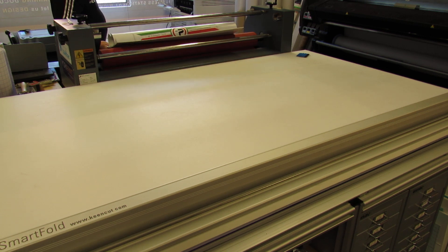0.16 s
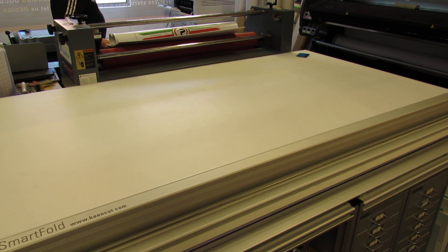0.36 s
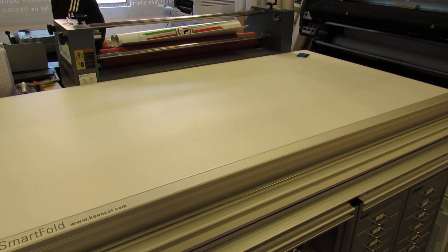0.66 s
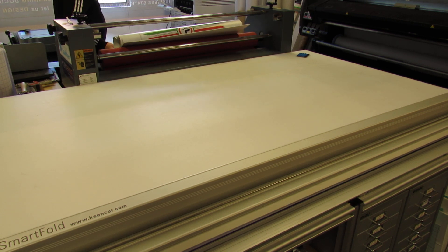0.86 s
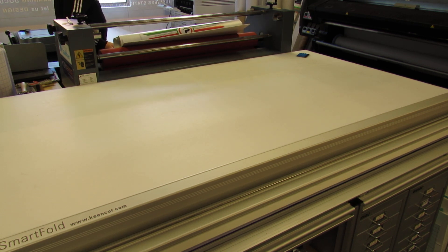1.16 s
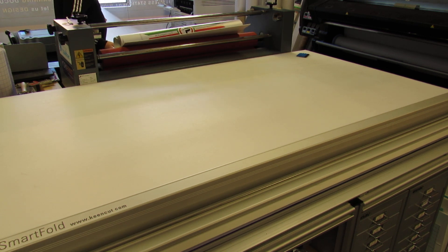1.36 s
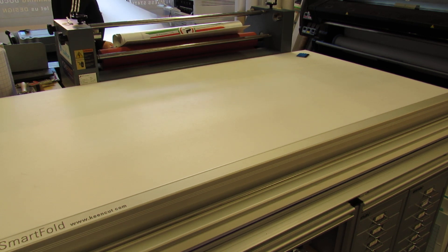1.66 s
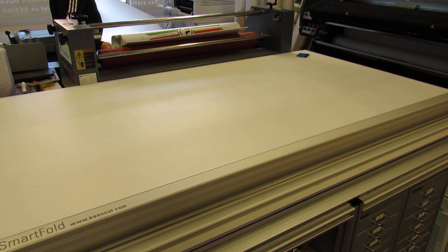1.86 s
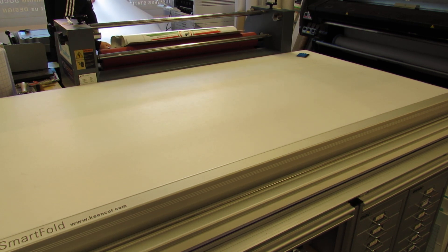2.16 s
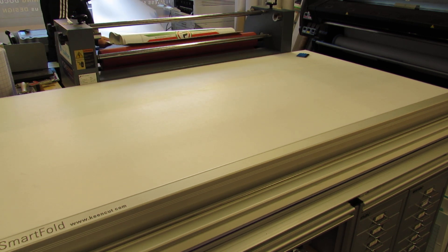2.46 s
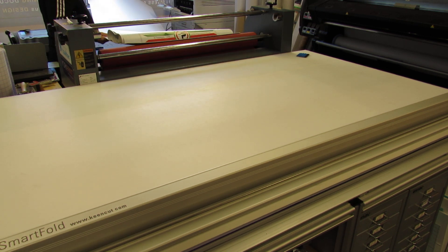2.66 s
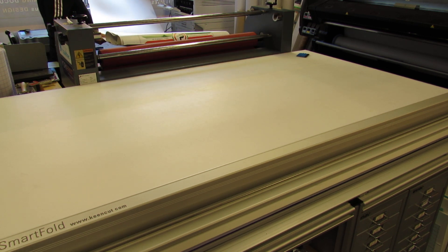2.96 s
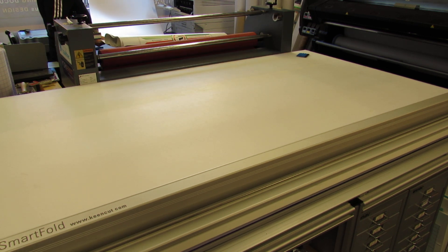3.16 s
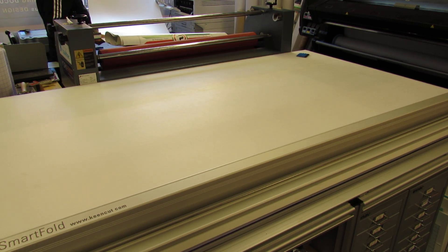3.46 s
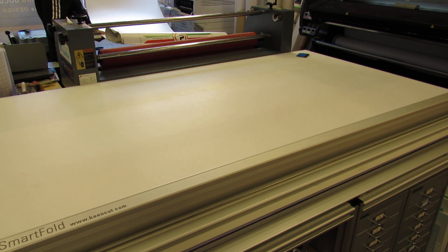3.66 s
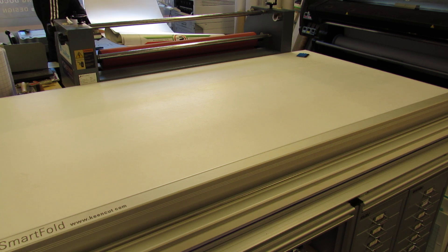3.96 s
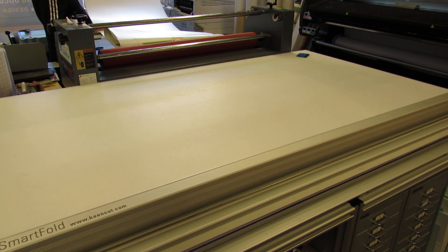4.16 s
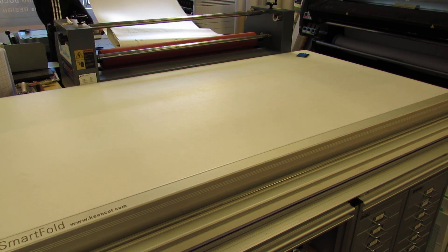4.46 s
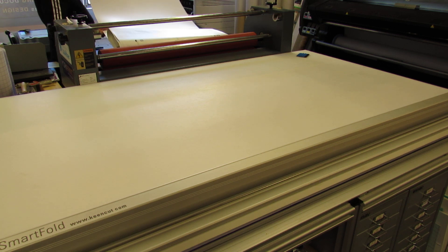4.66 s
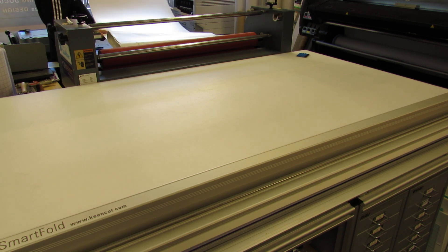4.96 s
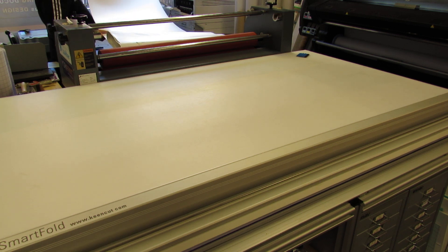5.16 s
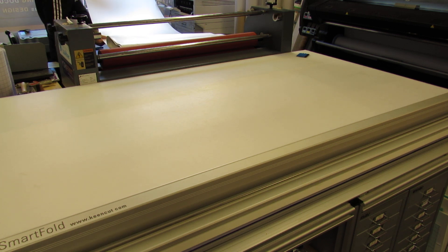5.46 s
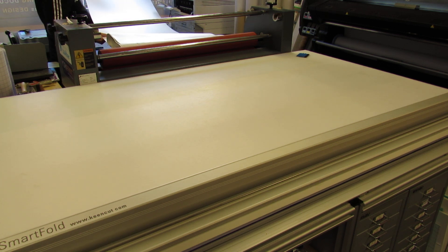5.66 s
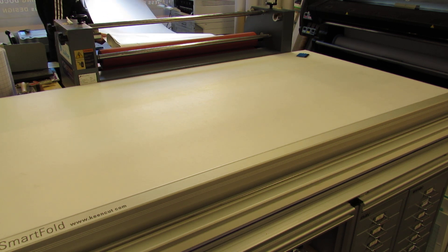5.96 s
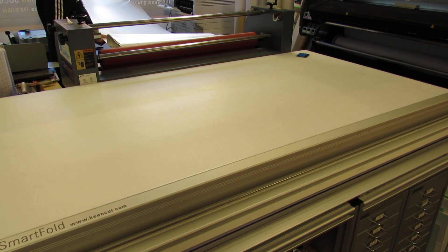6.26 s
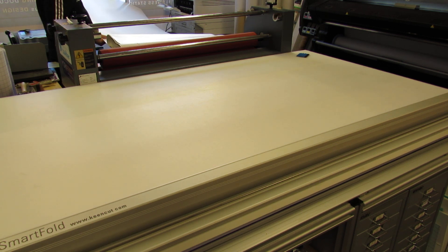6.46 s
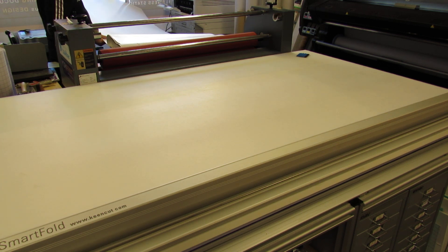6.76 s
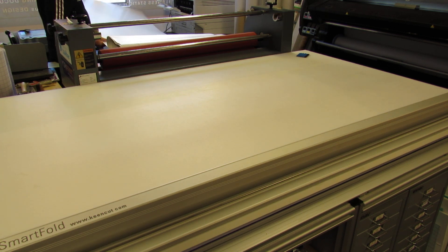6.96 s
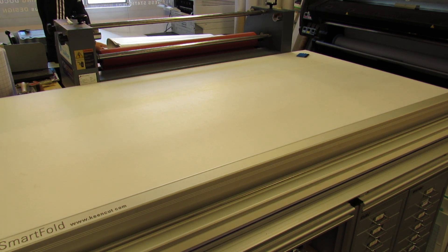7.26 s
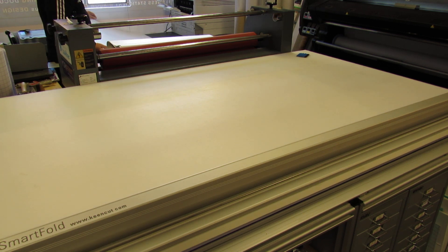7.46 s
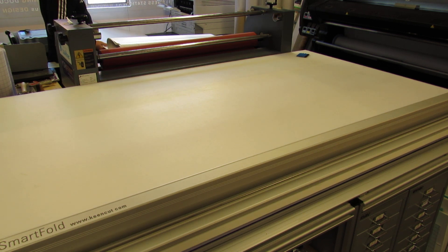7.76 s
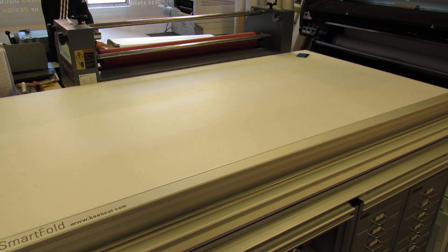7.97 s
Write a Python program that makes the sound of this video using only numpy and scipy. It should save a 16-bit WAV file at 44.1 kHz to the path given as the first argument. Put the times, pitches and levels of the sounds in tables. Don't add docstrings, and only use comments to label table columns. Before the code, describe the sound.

Machine hum and fan rush in a workshop while a stiff plastic sheet hisses and scrapes, snaps sharply, clinks metal, then thuds heavily.

```python
import sys
import numpy as np
from scipy import signal
from scipy.fft import rfft, irfft, next_fast_len
from scipy.io import wavfile
from scipy.ndimage import uniform_filter1d, map_coordinates

SR = 44100
rng = np.random.default_rng(int(sys.argv[2]) if len(sys.argv) > 2 else 0)


def digitize_waveform(pressure):
    field = np.atleast_2d(pressure).T
    bounded = np.clip(field, -1, 1)
    quanta = np.round(bounded * 32767).astype(np.int16)
    wavfile.write(sys.argv[1], SR, quanta)


def volts_from_decibels(level):
    exponent = np.asarray(level, float) / 20
    return 10 ** exponent


N = 357210


def unit(x):
    return x / np.sqrt(np.mean(x ** 2) + 1e-20)


def along(points, hz):
    f, v = np.transpose(points)
    return np.interp(np.log(hz + 1), np.log(f + 1), v)


def wobble(rate):
    knots = rng.standard_normal(int(N * rate / SR) + 4)
    return map_coordinates(knots, [np.arange(N) * rate / SR])


def filtered(x, response):
    m = next_fast_len(x.shape[-1] + 8192)
    return irfft(rfft(x, m) * response(np.fft.rfftfreq(m, 1 / SR)), m)[..., :x.shape[-1]]


def spread(pair, alike):
    turn = lambda hz: np.arccos(np.clip(along(alike, hz), -1, 1)) / 2
    mid, side = filtered(pair, lambda hz: np.array([np.cos(turn(hz)), np.sin(turn(hz))]))
    return np.array([mid + side, mid - side])


def rush(spectrum, alike, patchy_db):
    z = signal.stft(rng.standard_normal((2, N)), nperseg=512)[2]
    field = uniform_filter1d(rng.standard_normal(z.shape[1:]), size=5, axis=0)
    field = uniform_filter1d(field, size=10, axis=1)
    pair = signal.istft(z * volts_from_decibels(patchy_db * unit(field)), nperseg=512)[1][:, :N]
    colored = filtered(pair, lambda hz: volts_from_decibels(along(spectrum, hz)))
    return unit(spread(colored, alike))


def swells(rows):
    s, rise, fall, db = np.transpose(rows)[:, :, None]
    t = np.arange(0, N + 32, 32) / SR
    before = (s - t) / np.maximum(rise, 1e-3)
    after = (t - s) / np.maximum(fall, 1e-3)
    gains = volts_from_decibels(db - 20 * np.maximum(before, after))
    return np.interp(np.arange(N) / SR, t, np.linalg.norm(gains, axis=0))


def add(out, s, x):
    room = out[:, round(s * SR):][:, :x.shape[-1]]
    room += x[..., :room.shape[1]]


# (fastest [s], speeding up [s], slowing down [s], hiss [dB], scrape over hiss [dB])
STROKES = [(0.0, 0.086, 0.37, -56.5, 2.5), (0.4, 0.7, 0.49, -57, 0.5), (0.5, 0.21, 0.58, -53.5, 2),
           (0.7, 0.012, 0.56, -51, 3), (0.87, 0.2, 0.17, -43, -1), (1.41, 0.26, 0.54, -51, -9),
           (1.52, 0.35, 0.16, -52.5, 4), (1.8, 0.18, 0.42, -62, 3), (1.905, 0.1, 0.32, -50, -6),
           (2.09, 0.26, 0.49, -51.5, -1.5), (2.65, 0.46, 0.62, -59, 10.5), (3.08, .2, .4, -60, 4),
           (3.62, 0.044, 0.49, -44, -17), (3.76, 0.09, 0.31, -52.5, 11.5), (4.2, 0.17, 0.19, -39, -4),
           (4.55, 0.37, 0.6, -50, -1.5), (4.625, 0.14, 0.32, -55, 9), (5.56, 0.61, .2, -63, -7),
           (7.005, 0.021, 0.33, -49.5, 0), (7.055, 0.058, 0.22, -43.5, -4), (7.105, 0.03, 0.2, -42, -3),
           (7.14, 0.16, 0.18, -37, -1), (7.35, 0.26, 0.12, -52.5, 18), (7.618, 0.5, 0.21, -53, 9.5),
           (7.9, 0.54, 0.14, -65.5, 13), (8.03, 0.088, 0.38, -52, 6)]
# (time [s], hiss [dB], scrape over hiss [dB])
EDGE_SLIPS = [(1.15, -56.5, 1.5), (1.3, -52, 0.5), (2.894, -61, 5), (3.206, -63, 8), (4.92, -62, 5),
              (5.218, -62, 6), (5.452, -66, 7), (6.36, -63, 1), (6.488, -64.5, 11.5), (6.572, -71.5, 10),
              (7.435, -52.5, 10.5), (7.83, -58, -4)]
# (frequency [Hz], density [dB per Hz])
HISS_SPECTRUM = [(1290, -28), (2200, 3.5), (3800, -5.5), (4050, -5), (8210, -4), (10700, -7), (15000, -7.5)]
# (frequency [Hz], density [dB per Hz])
SCRAPE_SPECTRUM = [(380, -39), (650, -60.5), (712, -7), (1010, 4), (1900, -2), (2340, -15), (3500, -15.5),
                   (4550, -19.5), (7700, -120)]
# (frequency [Hz], left-right likeness [0-1])
NEAR_LIKENESS = [(60, 0.16), (130, 0.34), (290, 1), (640, 0.82), (1410, 0.97), (3100, 1), (6820, 0.98),
                 (15000, 0.083)]


def sheet():
    slip_rise_s, slip_fall_s = 0.033, 0.14
    strokes = STROKES + [(s, slip_rise_s, slip_fall_s, db, over_db) for s, db, over_db in EDGE_SLIPS]
    judder = wobble(28)
    hiss_gain = swells([row[:4] for row in strokes]) * volts_from_decibels(1.0 * judder)
    scrape_gain = swells([(s, rise, fall, db + over_db) for s, rise, fall, db, over_db in strokes])
    scrape_gain = scrape_gain * volts_from_decibels(0.5 * judder)
    hiss = hiss_gain * rush(HISS_SPECTRUM, NEAR_LIKENESS, patchy_db=1.1)
    return hiss + scrape_gain * rush(SCRAPE_SPECTRUM, NEAR_LIKENESS, patchy_db=0.7)


# (start [s], end [s], from [Hz], to [Hz], level [dB])
GAP = (4.08, 4.27, 1300, 3100, -46)


def swish():
    start, end, from_hz, to_hz, db = GAP
    u = np.clip((np.arange(N) / SR - start) / (end - start), 0, 1)
    phase = 2 * np.pi * np.cumsum(from_hz + (to_hz - from_hz) * u) / SR
    narrow = wobble(1600) * np.sin(phase) + wobble(1600) * np.cos(phase)
    return volts_from_decibels(db) * np.sin(np.pi * u) * narrow


# (frequency [Hz], t60 [s])
HALL_DECAY = [(200, 0.37), (1500, 0.82), (4000, 0.61), (12000, 0.35)]


def hall():
    hz, t, z = signal.stft(rng.standard_normal((2, SR * 3 // 4)), SR, nperseg=256)
    decay = volts_from_decibels(-60 * t / along(HALL_DECAY, hz)[:, None])
    tail = signal.istft(z * decay, SR, nperseg=256)[1]
    return spread(tail / np.linalg.norm(tail[0]), NEAR_LIKENESS)


def slaps(rows):
    out = np.zeros((2, N))
    tilt = [(900, 1), (2500, -4.5), (6500, 0.0), (14000, -7.5)]  # (frequency [Hz], level [dB])
    softening_db = -0.02
    for s, db, body_hz, shelf_db, contact, room_db in rows:
        tail = hall()
        u = np.arange(tail.shape[1]) / SR / max(contact, .0003)
        burst = rng.standard_normal(len(u)) * u * np.exp(1 - u)
        build_up = 1 - np.exp(-(u * contact / (contact + 0.0079)) ** 2)
        sound = burst + volts_from_decibels(room_db) * np.linalg.norm(burst) * tail * build_up
        modes = rng.standard_normal(300)
        body = lambda hz: volts_from_decibels(-11 * np.log2((hz + 1) / body_hz) ** 2)
        shelf = lambda hz: volts_from_decibels(shelf_db - softening_db * contact * hz + along(tilt, hz))
        uneven = lambda hz: volts_from_decibels(2.0 * map_coordinates(modes, [hz / 75]))
        add(out, s, volts_from_decibels(db + 2.5) * filtered(sound, lambda hz: (body(hz) + shelf(hz)) * uneven(hz)))
    return out


# (time [s], peak [dB], body [Hz], contact length [s], room [dB])
SHEET_SNAPS = [(0.6928, -36.5, 4050, 0.00041, 0.5), (2.499, -52, 5070, 0.0021, 3),
               (2.502, -38, 2620, 0.0084, 3), (2.716, -50, 1490, 0.0027, -5),
               (3.532, -27.5, 1820, 0.0046, 9.5), (3.535, -23, 6340, .0008, -2),
               (3.539, -23, 6300, 0.0011, -6), (3.815, -27.5, 1820, 0.016, 4.5),
               (4.2883, -29, 4400, 0.0011, -2), (4.2932, -22.5, 3850, 0.00028, 0),
               (4.299, -29.5, 3970, 0.0016, 3), (4.313, -44, 4270, 0.0089, -9)]


def snaps():
    shelf_db = -1
    return slaps([(s, db, hz, shelf_db, contact, room_db) for s, db, hz, contact, room_db in SHEET_SNAPS])


# (time [s], peak [dB], body [Hz], bright shelf [dB], room [dB])
DULL_KNOCKS = [(0.643, -34.5, 1250, -41, 0), (2.097, -36, 1550, -13.5, 9.5), (2.446, -42.5, 1190, -15, 8.5),
               (3.522, -29.5, 1480, -14, -3), (3.735, -35.5, 2280, -16, 9), (4.286, -27, 885, -18, 3),
               (5.004, -37, 1210, -14, 2), (5.031, -27, 600, -23, -5), (5.239, -50, 1096, -16, 5),
               (6.893, -26, 1230, -35, 1), (7.148, -28, 1250, -22, 9), (7.251, -19, 900, -34, -15),
               (7.286, -21, 1370, -28, -0.5), (7.328, -26.5, 1310, -25, 2)]


def knocks():
    contact_s = 0.0058
    return slaps([(s, db, hz, shelf_db, contact_s, room_db) for s, db, hz, shelf_db, room_db in DULL_KNOCKS])


# (time [s], peak [dB], body [Hz], contact length [s], room [dB])
SMALL_TAPS = [(0.696, -39, 1800, .003, -5), (0.797, -33, 800, .002, -6), (5.037, -49, 1600, 0.0034, 2.5),
              (6.9, -26.5, 1660, 0.0018, -2), (7, -42, 1180, 0.0027, -4), (7.023, -39, 956, .003, -4),
              (7.152, -23, 1400, 0.0032, -4), (7.293, -39, 2480, .003, 3), (7.342, -39, 1900, 0.0027, 0),
              (7.365, -37, 1500, .003, -2), (3.53, -27, 8000, .0006, -10), (3.5433, -21, 7000, .0003, -10),
              (3.5447, -24, 8000, .0007, -8), (3.831, -26, 2200, .002, -10), (5.014, -45, 1600, .004, 3),
              (7.144, -38, 3500, 0.0018, 2), (7.4, -34, 500, .003, -8), (0.646, -40, 1390, .0015, -6),
              (7.254, -26, 1000, .0015, -10), (7.035, -41.5, 3500, .003, 0)]


def taps():
    shelf_db = -24.5
    return slaps([(s, db, hz, shelf_db, contact, room_db) for s, db, hz, contact, room_db in SMALL_TAPS])


def struck_modes(rows):
    out, t = np.zeros((2, N)), np.arange(SR // 2) / SR
    weights, offsets_hz = np.array([[.5], [1], [.5]]), np.array([[-13], [0], [17]])
    for s, db, hz, t60 in rows:
        phase = rng.standard_normal((3, 1))
        modes = weights * np.sin(2 * np.pi * (hz + offsets_hz) * t + 3 * phase)
        shape = volts_from_decibels(db - 60 * t / max(t60, .03)) * (1 - np.exp(-t / 0.0018))
        add(out, s, shape * np.sum(modes, axis=0) + np.zeros((2, 1)))
    return out


# (time [s], peak [dB], pitch [Hz], t60 [s])
PANEL_THUDS = [(0.829, -39, 93, 0.62), (0.868, -38.5, 460, 0.32), (2.08, -40.5, 366, 0.61),
               (2.2, -37, 154, 0.57), (2.459, -36.5, 359.4, 0.45), (2.622, -37, 368, 0.65),
               (2.889, -39, 375, 0.46), (3.537, -29.5, 1082, 0.2), (3.549, -34.5, 215.4, 0.29),
               (4.159, -41, 448, 0.17), (4.292, -31, 566, 0.1), (5.006, -37, 415, 0.32),
               (5.017, -33.5, 155.4, 0.41), (5.151, -37, 305, 0.25), (5.215, -38, 377, 0.29),
               (5.019, -44, 1016, 0.41), (6.894, -30.5, 284, 0.34), (6.931, -44.5, 83.6, 0.92),
               (7.029, -32, 387, 0.24), (7.099, -58, 78.6, .7), (7.24, -26, 289, 0.2),
               (7.254, -24, 470, 0.07), (7.335, -29, 499, 0.13), (7.301, -33, 85, 0.9),
               (7.402, -36, 73.2, 0.57), (7.599, -27.5, 286.7, 0.47), (7.61, -48, 54.6, 0.55),
               (7.641, -31.5, 483, 0.22), (7.77, -37.5, 297, 0.6), (8.041, -36.5, 482, 0.28)]


def thuds():
    return struck_modes(PANEL_THUDS)


# (time [s], peak [dB],
# pitch [Hz], t60 [s])
STRUCK_PINGS = [(2.104, -55, 1873, .4), (2.104, -46, 2116, .5), (2.104, -50, 2740, .26),
                (2.104, -54, 3128, .33), (2.104, -51, 3472, 0.36), (2.506, -38, 575, .6),
                (2.506, -51, 1720, .6), (2.506, -45, 3445, .4), (2.506, -47, 3820, .4),
                (2.504, -47, 5575, 0.18), (2.504, -44, 6600, .18), (3.538, -43, 1525, .6),
                (3.538, -41, 1677, .6), (3.538, -48, 2024, .7), (3.538, -38, 3052, .4),
                (3.538, -40, 4301, .39), (3.538, -36, 6331, .2), (3.822, -28, 1490, .2),
                (3.822, -46, 1841, .46), (3.822, -34, 1992, 0.44), (3.822, -34, 2265, 0.39),
                (3.822, -37, 3806, 0.28), (5.035, -44, 150, .3), (5.04, -40, 500, .25),
                (7.03, -48, 500, 0.22), (3.538, -50, 10866, .36), (3.538, -45, 6721, .4),
                (4.297, -42, 2643, .26), (4.297, -45, 2988, 0.24), (4.297, -46, 3700, 0.31),
                (4.297, -42.5, 4300, .28), (7.262, -30.5, 150.5, 0.35), (7.3, -35, 287, 0.57),
                (2.506, -56, 4690, 0.44)]


def pings():
    return struck_modes(STRUCK_PINGS)


# (frequency [Hz], level [dB], t60 [s])
BAR_MODES = [(535, -9, 1.2), (905, -12, .3), (940, -6, .7), (959, -4, .75), (1167, -8, .85),
             (1220, -11, .8), (1663, -15, .6), (2105, -16, .5), (2379, -13, .4), (2891, -12, .35),
             (3230, -15, .55), (3700, -12, .4), (3758, -15, .35), (4317, -19, .45), (4635, -14, .7),
             (5592, -10, .4), (6584, -16, .3), (8037, -18, .2)]
# (time [s], level [dB])
BAR_CLINK = (2.504, -32)


def bar():
    out, t, ring = np.zeros((2, N)), np.arange(SR * 2 // 3) / SR, 0
    waver = lambda hz: wobble(15 + hz / 60)[:len(t)]
    for hz, db, t60 in BAR_MODES:
        level = volts_from_decibels(db - 60 * t / t60 + 2.2 * waver(hz))
        ring = ring + level * np.sin(2 * np.pi * hz * t + .5 * waver(hz))
    s, db = BAR_CLINK
    add(out, s, volts_from_decibels(db) * ring * (1 - np.exp(-t / 0.008)) + np.zeros((2, 1)))
    return out


# (center [Hz], width [Hz], depth [0-1])
TABLE_NOTCH = (690, 125, .9)


def across_table(struck):
    center_hz, width_hz, depth = TABLE_NOTCH
    return filtered(struck, lambda hz: 1 - depth * np.exp(-((hz - center_hz) / width_hz) ** 2))


# (time [s], dying [s], boards [dB], frame [dB])
BENCH_JOLTS = [(0.0, 0.29, -42, -40.5), (0.22, 0.058, -39.5, -48), (0.36, .6, -50, -63),
               (0.79, 0.55, -39, -41.5), (1.15, 0.7, -46, -42.5), (1.38, .5, -40.5, -45),
               (1.58, 0.9, -44, -47), (1.92, 0.37, -50, -41.5), (2.07, 0.16, -33.5, -35.5),
               (2.28, 0.95, -42.5, -47), (2.622, 1, -42, -52), (3.05, 0.6, -39.5, -45),
               (3.59, 0.39, -48, -32.5), (3.76, 0.2, -35, -40.5), (4.17, .15, -36, -39),
               (4.78, 0.18, -36.5, -59), (4.87, 0.097, -79, -39.5), (5.05, .14, -34, -41),
               (5.245, 0.15, -39, -58), (6.3, 0.19, -41, -48), (6.43, 0.33, -43, -49),
               (6.54, 0.44, -58, -39), (7.04, 0.2, -31, -32.5), (7.09, 0.18, -34, -44),
               (7.17, 0.65, -26.5, -33), (7.3, 0.35, -24, -25.5), (7.62, 0.17, -30, -62),
               (7.78, 0.65, -36, -45), (8.048, 1, -36.5, -41.5)]
# (time [s], dying [s], boards [dB], frame [dB])
BENCH_BLOWS = [(2.105, 0.21, -33, -48), (2.464, 0.71, -34.5, -35.5), (3.538, 0.22, -29, -52),
               (4.295, 0.58, -36.5, -45), (5.012, 0.25, -33, -45), (6.901, 0.13, -29, -29.5),
               (7.255, 0.041, -18, -25.5)]
# (frequency [Hz], density [dB per Hz])
BOARDS_SPECTRUM = [(140, -28), (240, -6.5), (291, -1), (413, -8), (519, -4), (700, -23.5), (910, -15),
                   (1540, -120)]
# (frequency [Hz], density [dB per Hz])
FRAME_SPECTRUM = [(62, -15), (105, -14.5), (151, 0), (250, -4), (320, -47), (550, -120)]


def bench():
    jolt_rise_s, blow_rise_s = 0.12, 0.017
    shakes = [(s, jolt_rise_s, *rest) for s, *rest in BENCH_JOLTS]
    shakes += [(s, blow_rise_s, *rest) for s, *rest in BENCH_BLOWS]
    idle = lambda: volts_from_decibels(-51 + 3.5 * wobble(5.6))
    boards_gain = np.hypot(swells([row[:4] for row in shakes]), idle())
    frame_gain = np.hypot(swells([row[:3] + row[4:] for row in shakes]), idle())
    boards = volts_from_decibels(-6.0) * boards_gain * rush(BOARDS_SPECTRUM, NEAR_LIKENESS, patchy_db=2.0)
    return boards + volts_from_decibels(-4.5) * frame_gain * rush(FRAME_SPECTRUM, NEAR_LIKENESS, patchy_db=1.5)


# (frequency [Hz], level [dB], pitch flutter [Hz])
MOTOR_TONES = [(50, -65.5, 0.81), (162.3, -60, 2.7), (247.4, -48, 1.94), (494.5, -57, 2.1),
               (1085, -69.5, 1.75), (1189, -67, 0.29), (1278, -71, 1.46), (1492, -67.5, 1.06),
               (1561, -64, 4.01)]
# (frequency [Hz], beat period [s], a peak [s])
MOTOR_BEAT = (96.85, .96, 5.5)


def motors():
    t, tones, ports = np.arange(N) / SR, 0, np.array([[-.05], [.05]])
    for hz, db, flutter_hz in MOTOR_TONES:
        phase = 2 * np.pi * (hz * t + np.cumsum(flutter_hz * wobble(6)) / SR)
        tones = tones + volts_from_decibels(db + 3 + 1.2 * wobble(5.4)) * np.sin(phase + ports)
    hz, period_s, peak_s = MOTOR_BEAT
    swell = 1 + 0.4 * np.cos(2 * np.pi * (t - peak_s) / period_s)
    return tones + volts_from_decibels(-50.5 + 0.82 * wobble(9.1)) * swell * np.sin(2 * np.pi * hz * t + 3 * ports)


# (frequency [Hz], density [dB per Hz])
FAN_SPECTRUM = [(13, -54), (22, -24), (86, -12), (195, -13), (244, -3), (306, -7.5), (441, -11.5),
                (520, -9), (685, -32.5), (851, -20), (1200, -22), (1400, -25), (1540, -24), (1930, -30),
                (5000, -48), (6500, -77), (11000, -120)]
# (frequency [Hz], left-right likeness [0-1])
FAN_LIKENESS = [(60, 0.059), (130, 0.19), (290, 0.44), (640, 0.42), (1410, 0.46), (3100, 0.86),
                (6820, 0.22), (15000, 0.1)]


def fan():
    gain = volts_from_decibels(-45.5 + 0.4 * wobble(2.48) + 0.68 * wobble(9.9))
    return gain * rush(FAN_SPECTRUM, FAN_LIKENESS, patchy_db=1.0)


# (frequency [Hz], level [dB], t60 [s])
DOOR_BOOM = (43, -36.5, 1)


def boom():
    hz, db, t60 = DOOR_BOOM
    t = np.arange(N) / SR
    ripple_db = 1.4 * np.cos(2 * np.pi * 6.5 * (t - .07))
    return volts_from_decibels(db - 60 * (t / t60) ** 2 + ripple_db) * np.sin(2 * np.pi * hz * t)


def scene():
    struck = snaps() + knocks() + taps() + thuds() + pings() + bar()
    return sheet() + swish() + across_table(struck) + bench() + motors() + fan() + boom()


def band_limit(x):
    return signal.sosfilt(signal.butter(12, 16110, fs=SR, output="sos"), x)


# (frequency [Hz], left minus right [dB])
PORT_LEVEL = [(60, 6), (110, 4.5), (200, 3.5), (380, 3.5), (700, 2), (1290, 0.5), (2380, 1), (4400, 0),
              (8120, 0.0), (15000, -1)]
# (frequency [Hz], left leads by [rad])
PORT_PHASE = [(0, -0.066), (520, -0.29), (1640, -0.27), (7150, 0.58), (9130, 0.61), (13600, 0.6),
              (15700, 0.1)]
# (frequency [Hz], density [dB per Hz])
MICROPHONE_HISS = [(1500, -11), (4000, -6), (12000, -5), (15000, -8.5)]


def record(dry):
    half = np.array([[.5], [-.5]])
    level = lambda hz: volts_from_decibels(half * along(PORT_LEVEL, hz))
    phase = lambda hz: np.exp(1j * half * along(PORT_PHASE, hz))
    ports = filtered(dry, lambda hz: level(hz) * phase(hz))
    hiss = volts_from_decibels(-64) * rush(MICROPHONE_HISS, [(1000, 0.22)], patchy_db=0.0)
    slope_db = lambda hz: -3 * np.clip((hz - 12500) / 2000, 0, 1)
    edge_db = lambda hz: -38 * np.clip((hz - 14950) / 250, 0, 1.5)
    limited = filtered(ports + hiss, lambda hz: volts_from_decibels(slope_db(hz) + edge_db(hz)))
    return band_limit(limited)


dry = scene()
out = record(dry)
digitize_waveform(out)
```